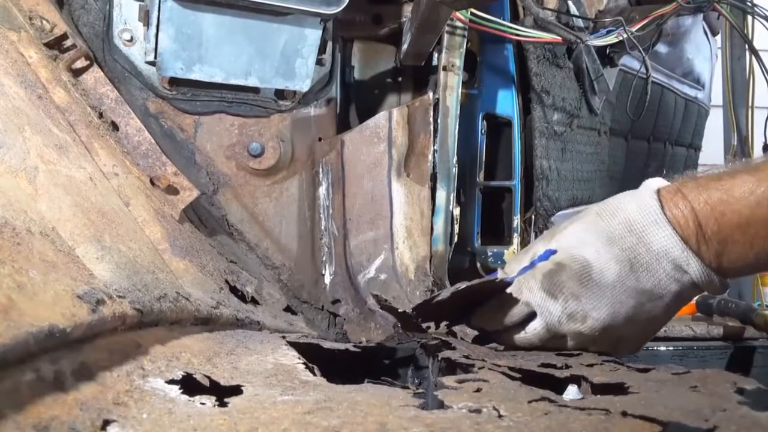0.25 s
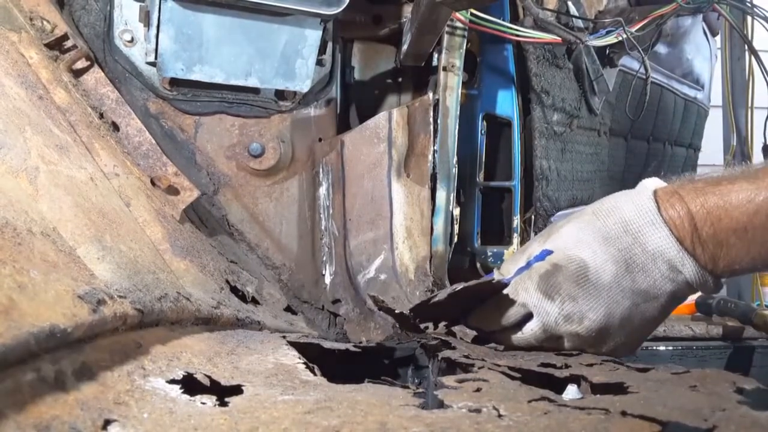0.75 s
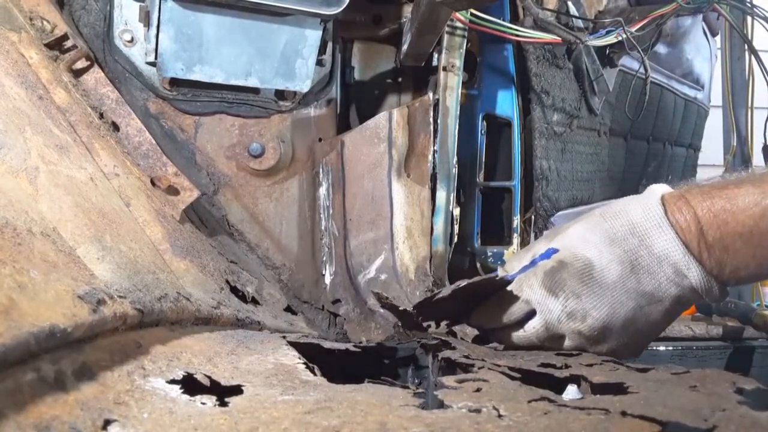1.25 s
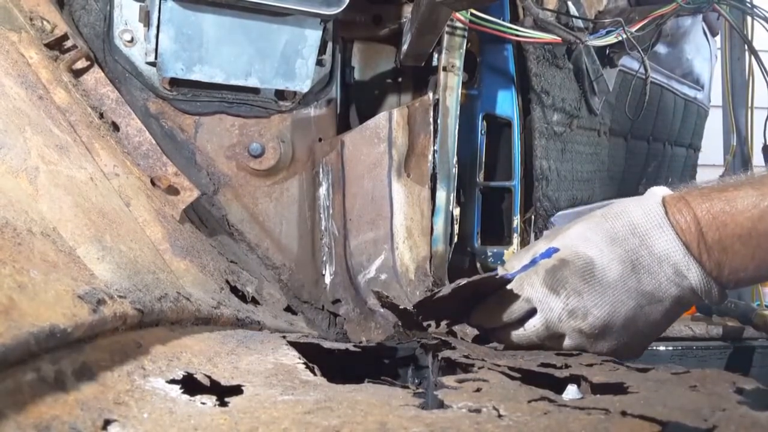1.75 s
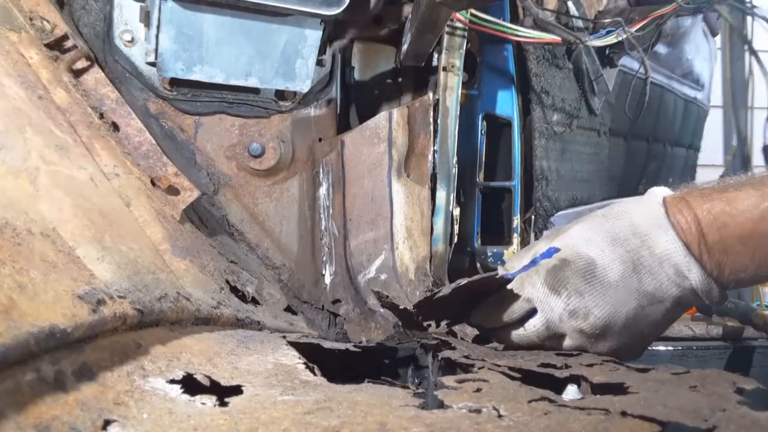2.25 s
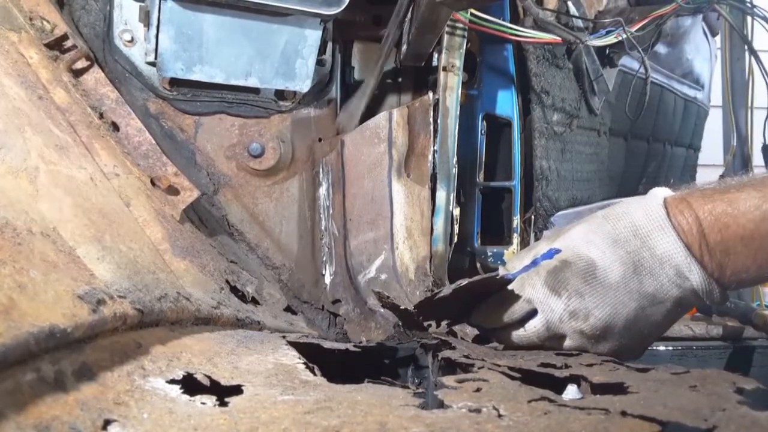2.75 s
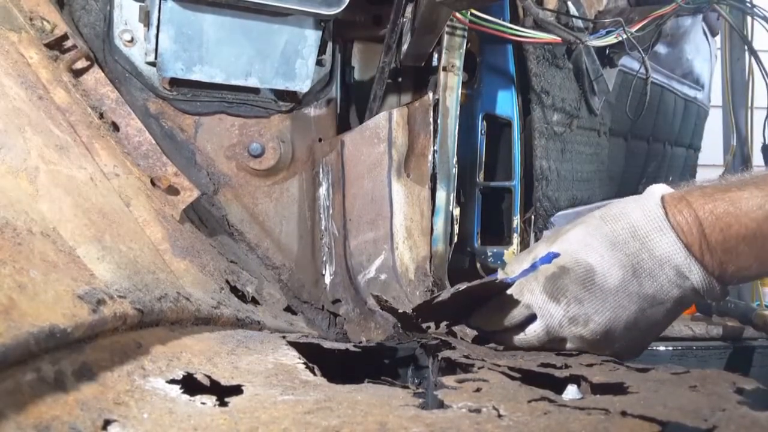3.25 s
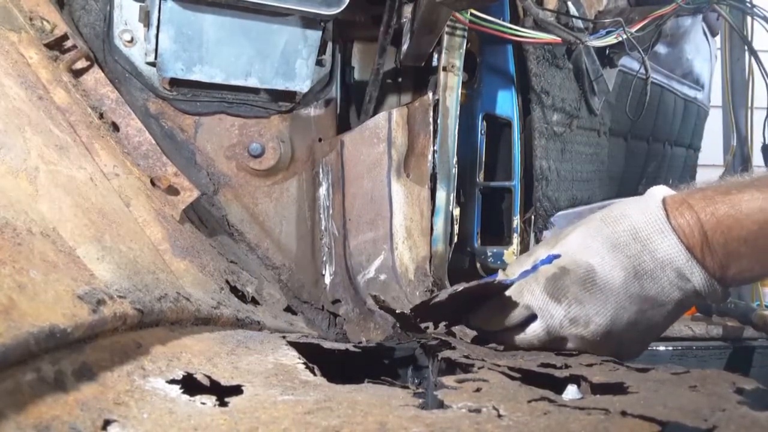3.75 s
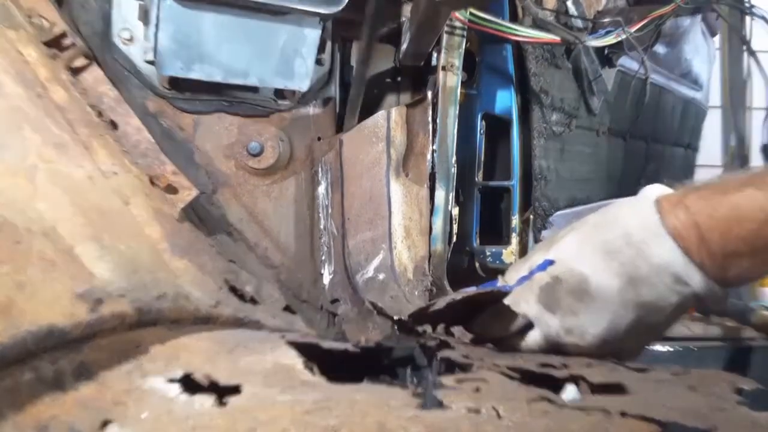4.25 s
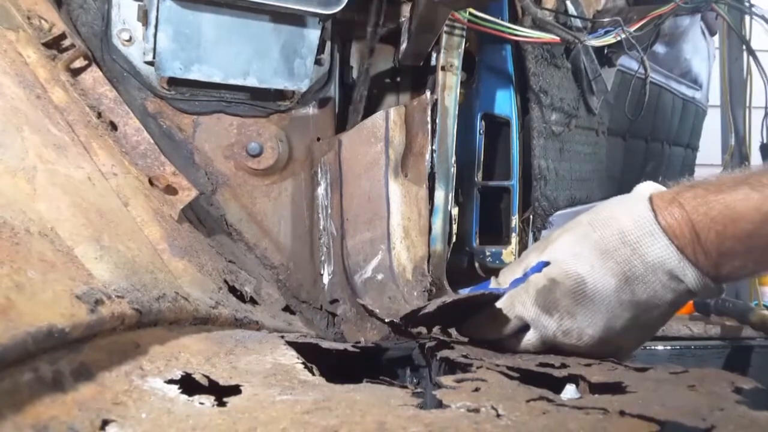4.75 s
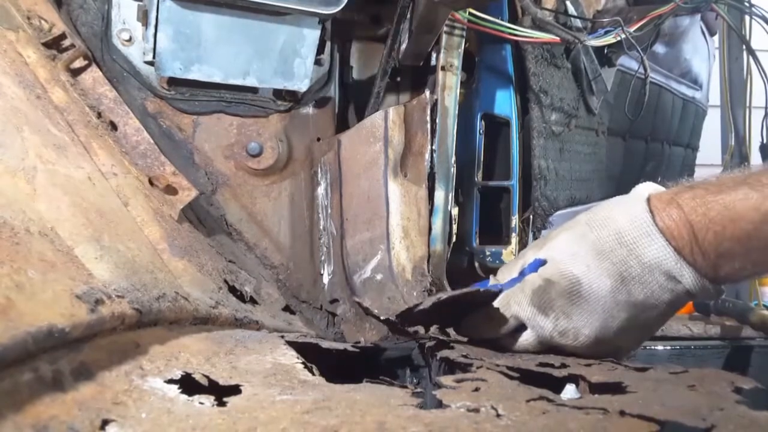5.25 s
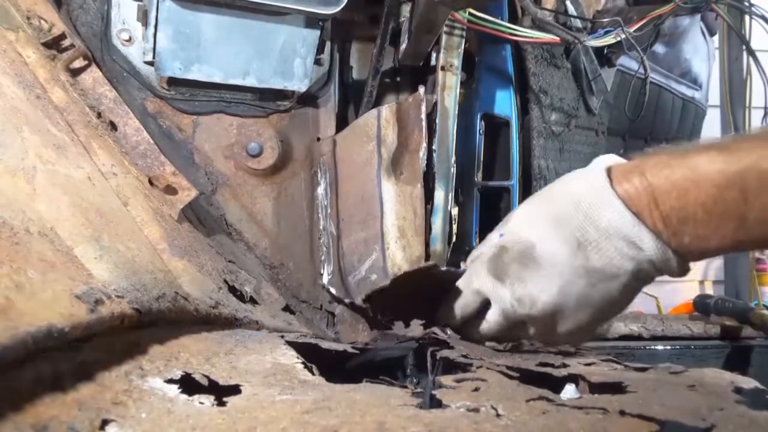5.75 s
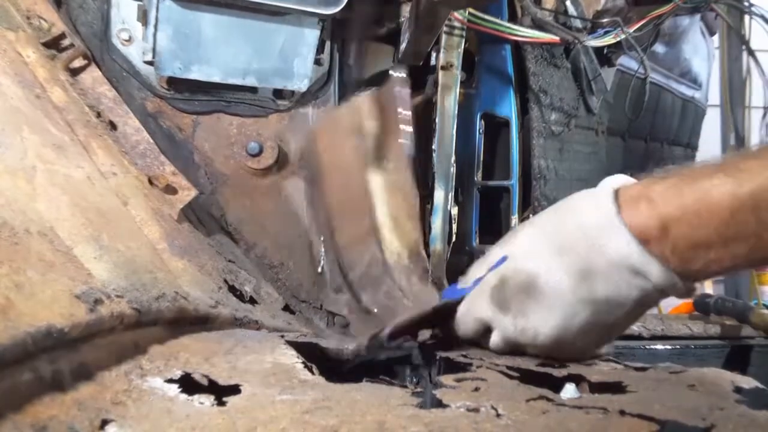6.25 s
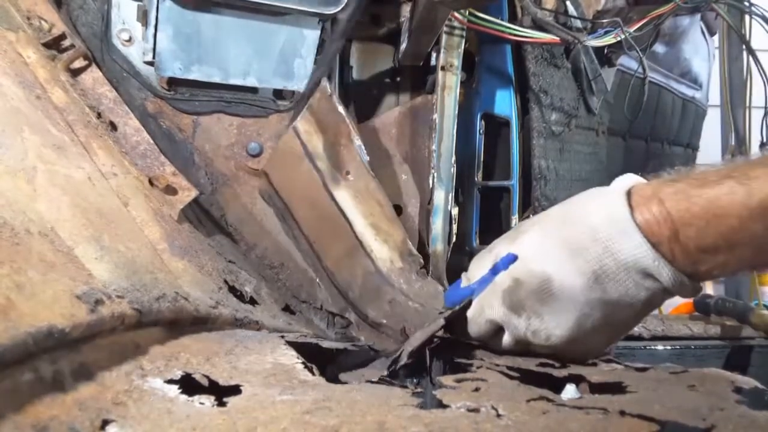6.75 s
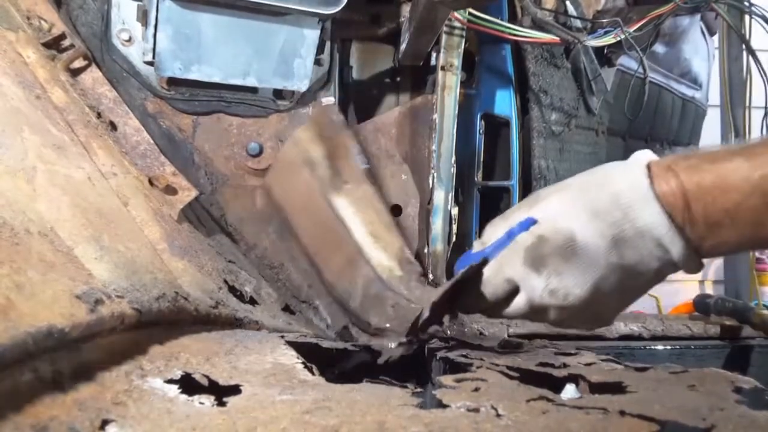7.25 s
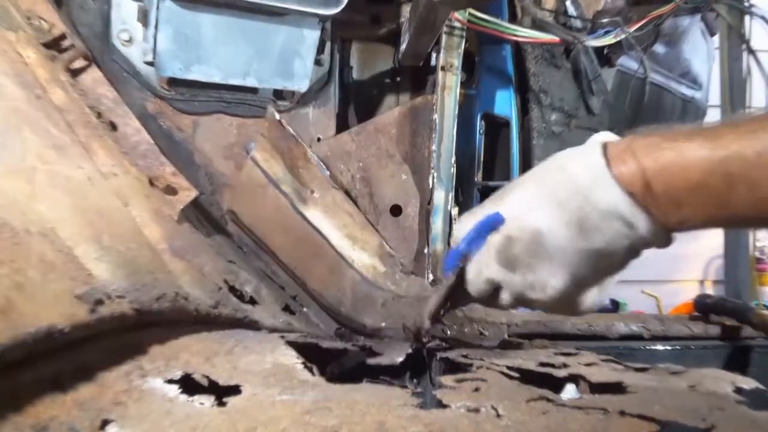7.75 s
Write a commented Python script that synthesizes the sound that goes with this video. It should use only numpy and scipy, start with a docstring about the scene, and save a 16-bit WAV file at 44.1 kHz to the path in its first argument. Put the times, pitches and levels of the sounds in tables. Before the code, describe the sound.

A close, dry, almost centred sound in a workshop. From 0 to 1.4 s there is mainly a smooth hiss like escaping air, swelling briefly, above a low rumble, with two barely audible ticks. At about 1.45 s a dull metal knock begins the work on wedged rusty sheet steel: hard clanks at 1.65 and 2.0, creaking scrapes to 2.3, then sparser thuds. Around 3.4-3.9 s comes a dense, heavy clatter with groaning scrapes and a low springy tone near 3.7. Another sharp knock and creak at 4.2, then weaker clicks. At 5.4 s the piece snaps free with the loudest bang and a short rattle. The background drops; faint bright ticks and light scrapes continue. From 6.8 s gritty knocks return with the hiss, strongest at 7.4-7.7 s as the edge drags and rings, ending in thin high rasping.

```python
"""In a workshop, a hand works a rusted sheet-steel piece out of a car floor, close to the microphone.
The piece creaks and knocks against the body, snaps free, then rings as it is dragged over the rusty edge.
Each contact is a burst of tiny slips, made of random clicks, that shakes the ringing modes of the panels.
Springing edges add decaying tones; filtered noise gives a hiss that swells and dips, above a low rumble."""
import sys
import numpy as np
from scipy import signal
from scipy.fft import rfft, irfft, next_fast_len
from scipy.io import wavfile

SR = 44100
rng = np.random.default_rng(int(sys.argv[2]) if len(sys.argv) > 2 else 0)


def transcribe(u):
    """Save the signal u as a 16-bit wav file named by the first command-line argument.

    u: samples, shape (n,) or (channels, n), limited to [-1, 1]; the rate is SR.
    q: integer samples, one column per channel.
    """
    v = np.clip(np.atleast_2d(u).T, -1, 1)
    q = np.round(v * 32767).astype(np.int16)
    wavfile.write(sys.argv[1], SR, q)


N = 353241  # length in samples, about 8 s
RING_SIZE = 32768  # longest ringing of one knock, in samples
SNAP_S = 5.40  # the piece comes free, in seconds
PIVOT_HZ = 1000  # hardness and narrowness tilt the colour around this pitch

# Knocks of the piece against the body. Hard edges are bright, soft flat blows dull; a narrow edge
# favours the middle. Each row: start in seconds, strength in dB, hardness in dB per octave,
# narrowness in dB per octave squared, crumbling time in seconds (the slips spread over up to four times it).
CLANKS = [(0.405, -53, 1.5, 0, 0.0021), (.681, -50.5, 7.5, 3.5, 0.0032), (1.457, -19.5, -3, -0.3, .005),
          (1.582, -26, -6, -0.1, 0.0013), (1.642, -12.5, 3, 1, 0.0026), (1.829, -26, 1.5, 2.5, 0.0017),
          (1.867, -29.5, 1.5, 1.6, 0.00086), (1.977, -17, 3.5, 1.57, .0012), (2.024, -11, 4, 2.3, 0.0015),
          (2.255, -15.5, 1.4, 1.66, .0006), (2.277, -16.5, -1, 1.5, .003),
          (2.662, -35.5, -0.5, 0.5, 0.0046), (2.782, -24, -4.5, 0.44, 0.0026),
          (3.086, -21, -5.5, 1.54, 0.0061), (3.377, -24, -1.5, .7, 0.0014), (3.395, -15, -4.5, 3.5, 0.0033),
          (3.427, -21, -1, 1.4, .0033), (3.446, -12, -5, -0.2, 0.0027), (3.49, -13.5, -2.5, 1.5, 0.0062),
          (3.517, -13, -5, 0, 0.0025), (3.597, -18.5, -17, 1, .0006), (3.631, -21, -4, .7, .004),
          (3.682, -11.5, -3.5, .9, 0.0024), (3.792, -23.5, -5.5, -0.95, 0.00051),
          (3.888, -21.5, -3.5, 0, 0.0075), (4.185, -20, 0, 2.5, 0.0008), (4.206, -13, 0.9, 2.4, 0.0007),
          (4.376, -28, -5, 0.7, 0.0058), (4.613, -33, 2, 1, 0.0019), (4.671, -23, 3, 1.5, 0.00055),
          (4.811, -28, 4, 1.4, 0.0042), (4.913, -21.5, 2.5, 0, .0025), (5.123, -37, 4.5, 0.1, 0.0049),
          (5.145, -25.5, 0.5, .7, 0.0027), (5.399, -6, 2, 0, 0.0034), (5.423, -16, -4, 2, .0065),
          (5.518, -20, 7, 0.96, 0.0016), (5.562, -25, 10, 3, 0.00058), (5.593, -28, 6, .2, 0.002),
          (5.651, -35.5, 2.5, 1.2, 0.00059), (5.803, -39.5, 5, 3.1, .0016), (5.961, -44, 9.5, 0.7, 0.0041),
          (6.046, -50, 7, 0, 0.00056), (6.111, -34.5, 3, 0.6, 0.0087), (6.216, -46, 4, 1, 0.0022),
          (6.288, -28.5, 5.5, 3, 0.0031), (6.387, -39, 6.5, 1.6, .0006), (6.753, -34.5, 1.5, 0, 0.0075),
          (6.823, -28, 8.5, 2.8, 0.0092), (6.851, -25, 5, 0.3, 0.0009), (6.867, -22, 7, 1, 0.00054),
          (7.006, -31.5, 0, -0.3, 0.0016), (7.122, -32, 4, 1.2, 0.0019), (7.193, -27.5, 4.5, 0.8, 0.00069),
          (7.32, -29, 1.5, 0.5, 0.0078), (7.379, -24.5, 3.5, -0.1, .009), (7.485, -16, -1.5, 1.5, 0.00058),
          (7.527, -17, 1.7, 1.5, 0.0012), (7.576, -21.5, 2.5, 1.1, 0.00076),
          (7.596, -18.5, 0, 2.5, 0.00063), (7.677, -23.5, 1.5, 0.17, 0.0012),
          (7.751, -23.5, 3.5, 0.9, 0.00097), (7.802, -29, 4, 1.3, 0.00053), (7.977, -37.5, 7, 0, 0.00045)]
# Colour of the shaken steel. Each row: frequency in Hz, relative level in dB per Hz.
STEEL = [(35, -37), (65, -24.5), (98, 1.5), (130, -2.5), (275, 1.5), (420, 0.5), (600, -7.5), (780, -5.5),
         (1000, -7), (1550, -5.5), (2300, -15.5), (3200, -12), (4800, -19), (6700, -12.5), (8600, -32.5),
         (14000, -31.5)]
# The freed piece adds its own voice to that colour. Each row: frequency in Hz, boost in dB.
FREE_COLOUR = [(70, 1), (180, 1), (430, 2), (1000, 2.5), (2000, 0.5), (3200, 4.5), (4500, 2), (6200, 0.5),
               (9000, 0.5), (12500, 8)]


def clanks(dense, held, freed, length_s=0.028, scatter_db=3, first_slip=2.9, sharp_s=0.0044, count=9):
    """Each contact is a quick run of slips as the rust crumbles; soft ones thud, hard ones rasp."""
    out = np.zeros(N + 2 * RING_SIZE)
    grid = np.geomspace(35, 15000, 60)
    octaves = np.clip(np.log2(grid / PIVOT_HZ), -3, 3.5)
    for s, db, hardness, narrowness, crumble_s in CLANKS:
        # slips crowd at the start, then thin out and weaken
        turn = (np.arange(count) + rng.random(count)) / count
        lags = 2 * (turn + turn ** 3) * crumble_s * SR
        lags = np.minimum(lags, RING_SIZE / 2).astype(int)
        sizes = undb(scatter_db * rng.standard_normal(count)) * (1 - turn / 2)
        push = np.bincount(lags, rng.choice([-1, 1], count) * sizes)
        push[0] += first_slip * np.exp(-crumble_s / sharp_s)  # a brisk contact opens with a tick

        modes = freed if s > SNAP_S else held
        blow = signal.fftconvolve(push, response(dense, modes))[:RING_SIZE]
        colour_db = spectrum_db(STEEL, grid) + contact_db(octaves, hardness, narrowness)
        if s > SNAP_S:
            colour_db = colour_db + spectrum_db(FREE_COLOUR, grid)
        blow = unit(impose(blow, zip(grid, colour_db)))
        start = int(s * SR)
        # the strength is the loudness the blow would have if packed into length_s
        out[start:start + RING_SIZE] += undb(db) * blow * np.sqrt(length_s * SR / RING_SIZE)
    return out[:N]


def contact_db(octaves, hardness, narrowness):
    """How a contact tilts and arches the colour of the steel, at so many octaves from the pivot."""
    return hardness * octaves - narrowness * octaves ** 2


def response(dense, named, crack_db=-4, crack_s=0.013, rattle_db=-2, rattle_s=0.023,
             room_db=-13, room_s=0.06, vary=1.0, bend=0.0497):
    """The steel struck at a new spot: its modes, a crack, a short rattle and the workshop's echo."""
    t = np.arange(RING_SIZE) / SR
    out = rng.standard_normal(len(dense)).astype(np.float32) @ dense
    stretch = np.exp(bend * (2 * rng.random() - 1))
    out = np.interp(t * stretch, t, out)  # bending retunes the thin sheet
    strengths = 1 + vary * (2 * rng.random(len(named)) - 1)
    signs = rng.choice([-1, 1], len(named))
    out = out + (signs * strengths).astype(np.float32) @ named
    # crack, rattle and echo are fading bursts of noise
    for db, decay_s in (crack_db, crack_s), (rattle_db, rattle_s), (room_db, room_s):
        burst = unit(rng.standard_normal(RING_SIZE) * np.exp(-t / decay_s))
        out = out + undb(db) * burst / np.sqrt(RING_SIZE)
    return out


def dense_modes(low_t60_s=0.32, high_t60_s=0.067, spread=0.074, count=220):
    """The crowded modes of crumpled sheet; rust damps each by a different amount."""
    hz = np.geomspace(570, 15500, count) - 500
    spacing = np.gradient(hz)
    hz = hz + spacing * rng.uniform(-0.63, 0.77, count)
    t60 = np.geomspace(low_t60_s, high_t60_s, count) * np.exp(spread * rng.standard_normal(count))
    # equal energy per Hz, whatever the damping
    db = 10 * np.log10(spacing * t60 * 2 / np.log(1000))
    return ringing(np.column_stack([hz, db, t60]))


def ringing(modes):
    """One decaying sine per (Hz, dB, t60) row, with that gain at its resonance."""
    hz, db, t60 = np.transpose(modes).astype(np.float32)[:, :, None]
    t = np.arange(RING_SIZE, dtype=np.float32) / SR
    loss = 3 * np.log(np.float32(10)) / np.maximum(t60, .02)
    decay = np.exp(-np.minimum(loss * t, 20))
    return 2 * loss / SR * undb(db) * decay * np.sin(2 * np.pi * hz * t)


def scraping(dense, held, freed, slip_hz=330, scatter_db=5, catch_db=3,
             groan_db=-1, scrape_db=-1, rasp_db=-1, grit_db=-1, size=8192):
    """Stick-slip clicks of uneven size: their low part bends the panel, their high part grinds the rust."""
    sizes = undb(scatter_db * np.minimum(rng.exponential(size=N), 3))
    slips = (rng.random(N) < slip_hz / SR) * rng.choice([-1, 1], N) * sizes
    slips = tint(slips * undb(catch_db * flicker(count=640)), STEEL)  # the edge catches and lets go

    # groan, scrape, rasp and grit each fill one band of pitch, in Hz
    zones = [(70, 550), (550, 2500), (2500, 8000), (8000, 15000)]
    gains = undb([groan_db, scrape_db, rasp_db, grit_db])[:, None] * rub_levels()
    force = np.zeros(N)
    for zone, gain in zip(zones, gains):
        band = signal.butter(4, zone, "band", fs=SR, output="sos")
        force += gain * unit(signal.sosfilt(band, slips))

    flat = [(40, 0), (16000, 0)]
    out = np.zeros(N + 2 * RING_SIZE)
    # the contact point moves on, and each stretch of edge shakes the modes differently
    for start in range(0, N, size):
        modes, colour = (freed, FREE_COLOUR) if start > SNAP_S * SR else (held, flat)
        spot = impose(response(dense, modes), colour)
        shaken = signal.fftconvolve(force[start:start + size], spot)
        out[start:start + len(shaken)] += shaken
    # the crackle of the rust also comes straight from the contact
    direct = .15
    return np.sqrt(1 - direct) * out[:N] + np.sqrt(direct) * force


# Pulls that drag the rusty edge over the body. Each row: moment of the hardest pull in seconds, swell in
# seconds, release in seconds, relative level in dB, hardness in dB per octave,
# narrowness in dB per octave squared.
PULLS = [(.15, 0.98, 1, -57, 1, 0), (1.702, 0.19, 0.18, -27, -3, 0), (2.12, 0.49, 0.093, -27, -4, -0.4),
         (2.225, 0.096, 0.072, -24, 0, 2), (2.30, 0.11, 0.14, -29, -2.5, -0.1),
         (2.63, 0.12, 0.093, -36.5, 0, 0), (3.419, 0.16, 0.065, -20.5, .5, 0.65),
         (3.56, 0.054, 0.21, -23.5, -8.5, -1.5), (3.649, 0.12, 0.071, -23.5, -2, 5),
         (3.93, 0.19, 0.085, -30, -1, 0.5), (4.16, 0.097, 0.15, -22.5, 0.6, 1),
         (4.233, 0.054, 0.064, -21, -1, 0.5), (4.705, 0.086, 0.085, -25.5, -4, 1.3),
         (4.84, 0.11, 0.13, -33, 3, .7), (5.48, 0.12, 0.17, -25.5, -0.5, .5),
         (6.13, 0.081, 0.19, -36, 3.5, 1), (6.498, 0.16, 0.12, -41, 0, 1.3),
         (6.624, .1, 0.047, -42, 1, 0.5), (6.80, .06, 0.17, -30.5, -3, -0.5),
         (7.05, 0.047, 0.058, -35.5, -0.5, 1.5), (7.169, 0.082, 0.1, -27.5, 0.5, 0.4),
         (7.418, 0.084, .12, -16.5, 1.5, 1.9), (7.535, 0.13, 0.11, -20.5, 0.5, 0.3),
         (7.82, 0.14, 0.2, -27.5, 5, 1.5), (7.919, .08, 0.15, -26, 8.5, 2.5)]
# What rubbing shakes: groan, scrape, rasp and grit. Each row: octaves from the pivot, relative level in dB.
RUB_PARTS = [(-2, 0.5), (0, -2), (1.46, -11.5), (6, -11.5)]
PULL_RANGE_DB = 23.5  # a pull rises by this much over its swell and falls by it over its release
GRIP_S = 1.47  # the wedged piece starts to chafe, in seconds
# light chafing, dull while wedged and grittier once free: relative level, hardness, narrowness as above
WEDGED_CHAFE, FREE_CHAFE = (-45, -3, 0.47), (-53.5, 0, 0)


def rub_levels():
    """Gain of groan, scrape, rasp and grit over time: each pull swells and lets go, above the light chafing."""
    t = np.arange(0, N, 64) / SR
    octaves, part_db = np.transpose(RUB_PARTS)
    rubs = [((t > GRIP_S) & (t < SNAP_S), *WEDGED_CHAFE), (t > SNAP_S, *FREE_CHAFE)]
    for s, swell_s, release_s, *contact in PULLS:
        away = np.maximum((s - t) / swell_s, (t - s) / release_s)
        rubs.append((undb(-PULL_RANGE_DB * away), *contact))
    power = 0
    for envelope, db, hardness, narrowness in rubs:
        # a contact's power is shared out among the four parts
        shares = undb(part_db + contact_db(octaves, hardness, narrowness)) ** 2
        power = power + np.outer(shares / shares.sum(), (undb(db) * envelope) ** 2)
    return curves(np.column_stack([t, np.sqrt(power).T]))


# An edge catches and springs loose. Each row: start in seconds, ring level in dB,
# frequency in Hz of the modes excited most.
FLICKS = [(1.645, -23, 364), (2.258, -32, 1550), (3.681, -15, 257), (4.206, -22, 253), (4.21, -29, 820),
          (4.673, -32.5, 804), (4.815, -32, 835), (4.926, -34, 920), (5.52, -45, 1560),
          (5.806, -52.5, 3200), (6.123, -39, 1836), (6.132, -39.5, 1020), (6.289, -44, 2490),
          (7.597, -26.5, 1224), (7.6, -32.5, 3220), (7.804, -43, 5890), (7.859, -36.5, 3280),
          (7.977, -37, 5900)]
# Ringing of the car floor and pillar. Each row: frequency in Hz, relative gain in dB,
# time to fade by 60 dB in seconds when nothing grips it.
FLOOR_MODES = [(98, 10, .5), (167, 7, .3), (236, 6, .25), (284, 8, .25), (318, 4, .3), (364, 8, .7),
               (420, 5, .4), (519, 6, .25), (614, 2, .3), (755, 8, .3), (798, 5, .7), (900, 5, .5),
               (1002, 7, .3), (1160, 5, .3), (1262, 5, .25), (1384, 4, .2), (1459, 3, .4), (1545, 10, .45),
               (1665, 5, .2), (1760, 7, .3), (2137, 3, .2), (3330, 3, .2), (6100, 6, .12)]
# Ringing of the freed piece. Each row: frequency in Hz, relative gain in dB,
# time to fade by 60 dB in seconds.
PIECE_MODES = [(423, 6, .7), (700, 3, .6), (1076, 11, .7), (1152, 3, .5), (1304, 9, .5), (1550, 8, .9),
               (1836, 11, 1.0), (2256, 3, .4), (2485, 8, .3), (2955, 3, .4), (3170, 8, .35), (3228, 7, .6),
               (3800, 7, .4), (3935, 5, .4), (4474, 3, .4), (4850, 4, .4), (5960, 10, .5), (6083, 6, .4),
               (7477, 8, .4)]


def flicks(floor, piece, octaves=0.15, length_s=0.063, grip_s=0.17, lowest_hz=60):
    """A springing edge rings a few neighbouring modes: the floor's while the piece is held, then its own."""
    out = np.zeros(N + 2 * RING_SIZE)
    grip = np.exp(-np.arange(RING_SIZE) / SR / grip_s)  # the wedged piece damps the floor
    for s, db, hz in FLICKS:
        modes, rings, damping = (PIECE_MODES, piece, 1) if s > SNAP_S else (FLOOR_MODES, floor, grip)
        weights = np.exp(-(np.log2(np.array(modes)[:, 0] / hz) / octaves) ** 2)
        ring = unit(damping * (weights @ rings))
        start = int(s * SR)
        out[start:start + RING_SIZE] += undb(db) * ring * np.sqrt(length_s * SR / RING_SIZE)
    # the rings carry no deep bass
    return signal.sosfilt(signal.butter(2, lowest_hz, "high", fs=SR, output="sos"), out[:N])


# Colour of the workshop background. Each row: frequency in Hz, relative level in dB per Hz.
SHOP = [(30, -10), (80, -4.5), (115, 4), (235, -3.5), (400, -9.5), (700, -16), (1000, -21.5), (1400, -20.5),
        (2400, -26), (3200, -12.5), (5200, -9), (7000, -18.5), (8700, -45), (14500, -34)]
# The hiss swells briefly at first. Each row: time in seconds, boost of the hiss in dB.
HISS_LEVEL = [(0, 2), (.2, 4), (.52, 3.5), (.7, 0.5), (1.4, 1), (4.4, 2), (8, 6)]
SHOP_DB = -48  # background level before the hiss boost and the dip
# the background dips at the snap, stays low and comes back
DIP_DB, DIP_FALL_S, DIP_HOLD_S, DIP_RETURN_S = -13.5, 0.17, 1.36, 0.17


def workshop(split_hz=2200):
    """A smooth hiss, as of escaping air, above a low rumble, both filtered noise; both dip after the snap."""
    hiss_db, = curves(HISS_LEVEL)
    dip_times = SNAP_S + np.cumsum([0, DIP_FALL_S, DIP_HOLD_S, DIP_RETURN_S])
    dip_db = np.interp(np.arange(N) / SR, dip_times, [0, DIP_DB, DIP_DB, 0])
    air = undb(SHOP_DB) * unit(tint(rng.standard_normal(N), SHOP))
    rumble = signal.sosfiltfilt(signal.butter(2, split_hz, fs=SR, output="sos"), air)
    flicker_db = .5
    hiss = (air - rumble) * undb(hiss_db + flicker_db * flicker(count=90))
    return undb(dip_db) * (rumble + hiss)


def flicker(count):
    """A random level that passes through count values; spread near 1."""
    return np.interp(np.arange(N), np.linspace(0, N, count), rng.standard_normal(count))


def undb(db):
    """Decibels to gain."""
    return 10 ** (np.asarray(db) / 20)


def unit(x):
    """Scale to rms 1."""
    return x / np.sqrt(np.mean(x ** 2) + 1e-20)


def curves(table):
    """The columns of a timed table, one value per sample."""
    s, *columns = np.transpose(table)
    return [np.interp(np.arange(N) / SR, s, c) for c in columns]


def spectrum_db(points, hz):
    """Read (Hz, dB) points on a log-frequency axis."""
    f, db = np.transpose(sorted(map(tuple, points)))
    return np.interp(np.log(hz + 1), np.log(f), db)


def tint(x, points):
    """Causal filter with the gain of the (Hz, dB) points."""
    size = next_fast_len(len(x), real=True)
    gain = undb(spectrum_db(points, np.fft.rfftfreq(size, 1 / SR)))
    # folding the cepstrum forward in time keeps the filter from sounding early
    cepstrum = irfft(np.log(gain), size)
    cepstrum[1:size // 2] *= 2
    cepstrum[size // 2 + 1:] = 0
    return irfft(rfft(x, size) * np.exp(rfft(cepstrum)), size)[:len(x)]


def zone_db(power, hz, zones):
    """Summed power in each (low, high) zone, in dB."""
    return np.array([10 * np.log10(power[a:b].sum() + 1e-20) for a, b in np.searchsorted(hz, zones)])


def impose(x, points):
    """Give x the broad spectrum of the points and keep its narrow resonances."""
    centres = np.geomspace(40, 16000, 17)
    zones = np.outer(centres, [.78, 1.28])
    power, hz = np.abs(rfft(x)) ** 2, np.fft.rfftfreq(len(x), 1 / SR)
    own_db = zone_db(power, hz, zones) - zone_db(np.ones(len(hz)), hz, zones)
    return tint(x, zip(centres, spectrum_db(points, centres) - own_db))


# Width of the sound. Each row: frequency in Hz, level of the side against the middle in dB.
WIDTH = [(60, -56), (700, -56), (2500, -49), (6000, -42.5), (14000, -24)]


def scene(floor_db=-2, freed_floor_db=-7, piece_db=-2):
    """All sources lie straight ahead; reflections in the car's shell widen them a little."""
    dense, floor, piece = dense_modes(), ringing(FLOOR_MODES), ringing(PIECE_MODES)
    # once free, the floor rings less and the piece joins in
    held = np.float32(floor * undb(floor_db))
    freed = np.float32(np.vstack([floor * undb(freed_floor_db), piece * undb(piece_db)]))
    mid = clanks(dense, held, freed) + scraping(dense, held, freed) + flicks(floor, piece) + workshop()
    shell = unit(rng.standard_normal(size=256)) / np.sqrt(256)
    side = tint(signal.oaconvolve(mid, shell)[:N], WIDTH)
    return np.array([mid + side, mid - side])


TOP_HZ = 14800  # nothing much is heard above this


def record(dry):
    """The recorder rounds peaks near full scale and cuts the top."""
    rounded = dry / (1 + dry ** 6) ** (1 / 6)
    return signal.sosfilt(signal.ellip(10, .2, 70, TOP_HZ, fs=SR, output="sos"), rounded)


dry = scene()
out = record(dry)
transcribe(out)
```